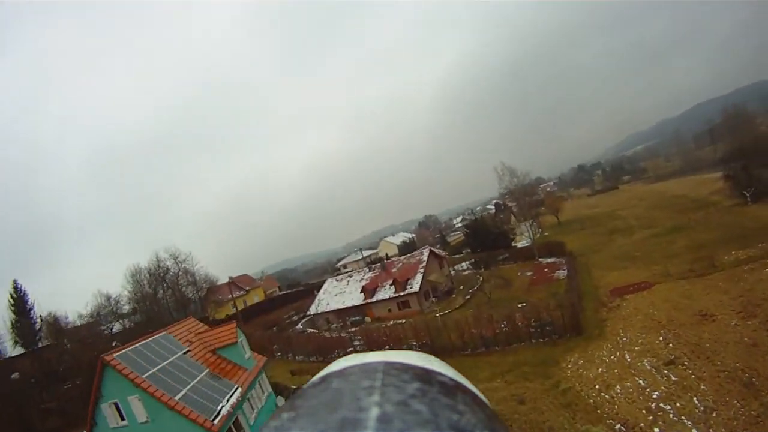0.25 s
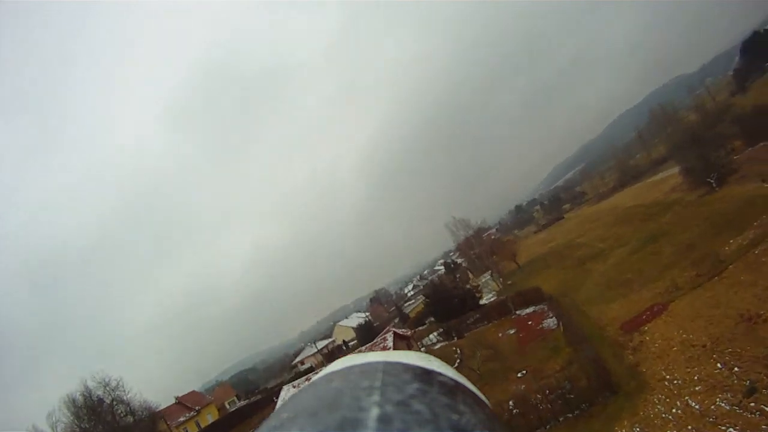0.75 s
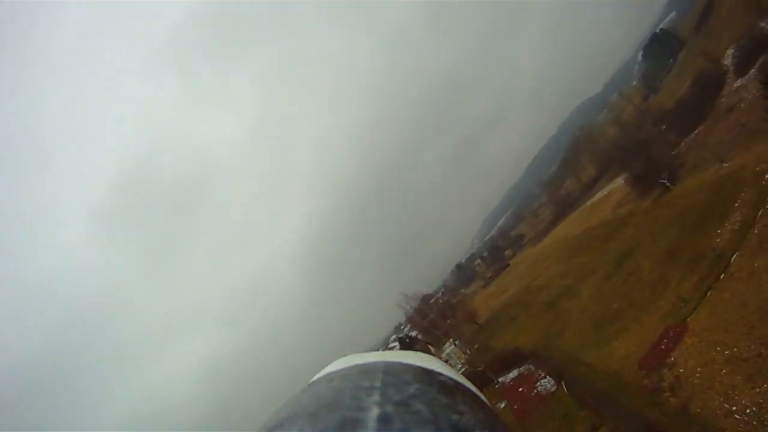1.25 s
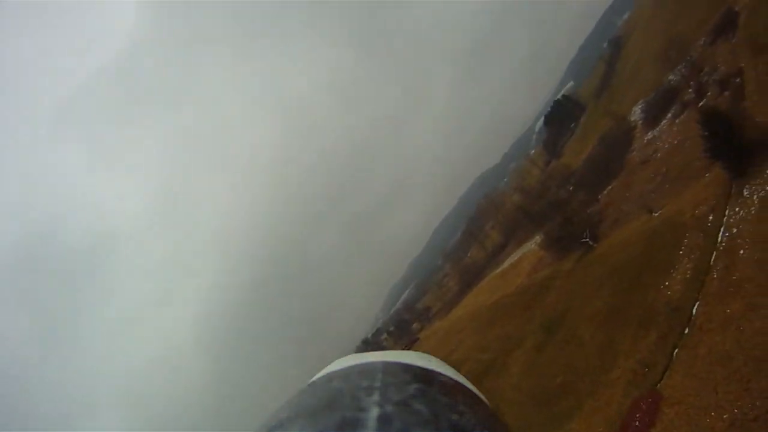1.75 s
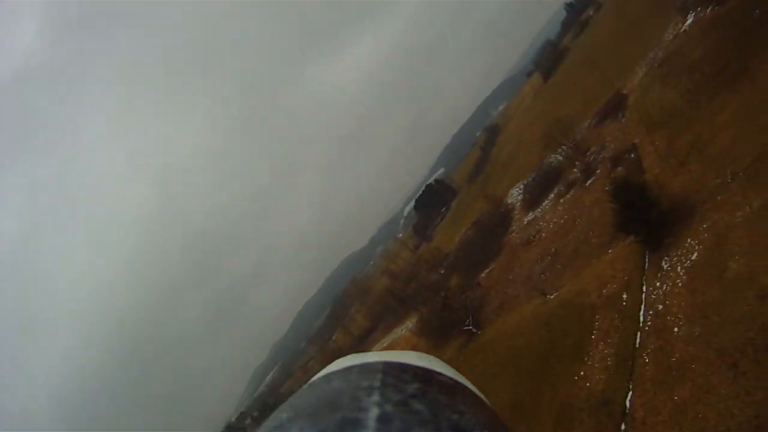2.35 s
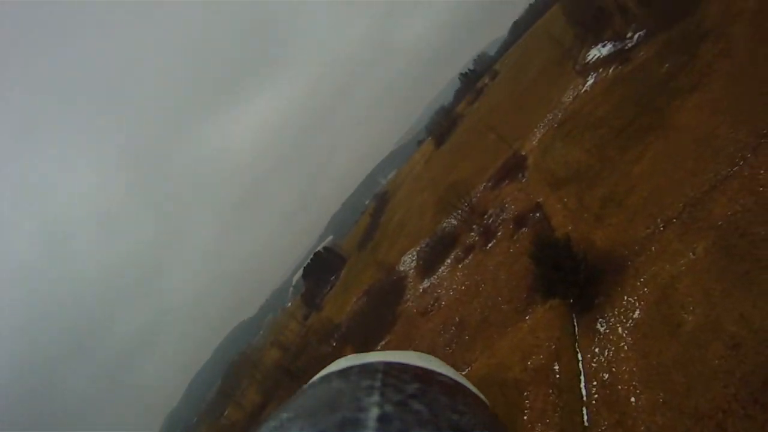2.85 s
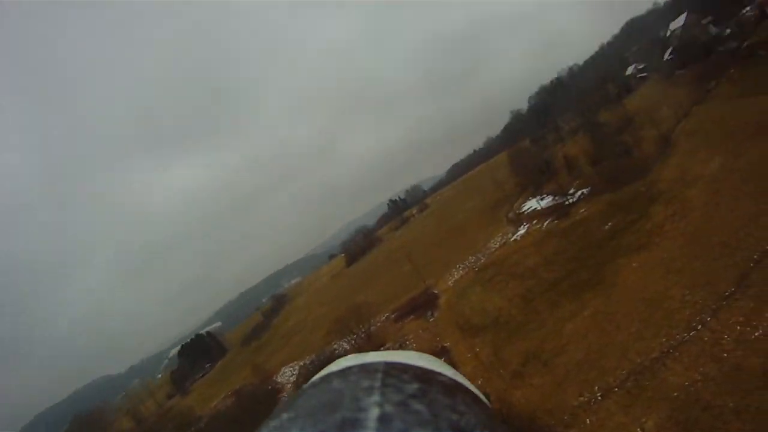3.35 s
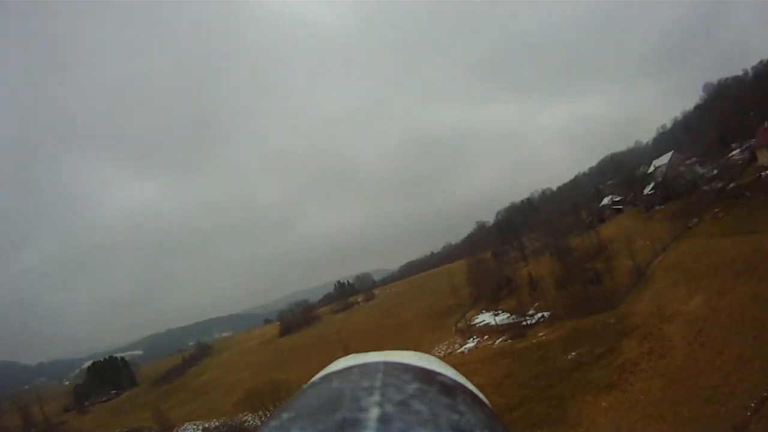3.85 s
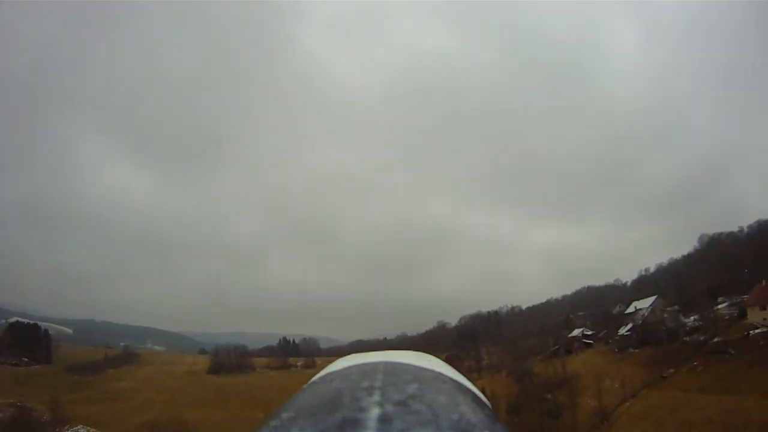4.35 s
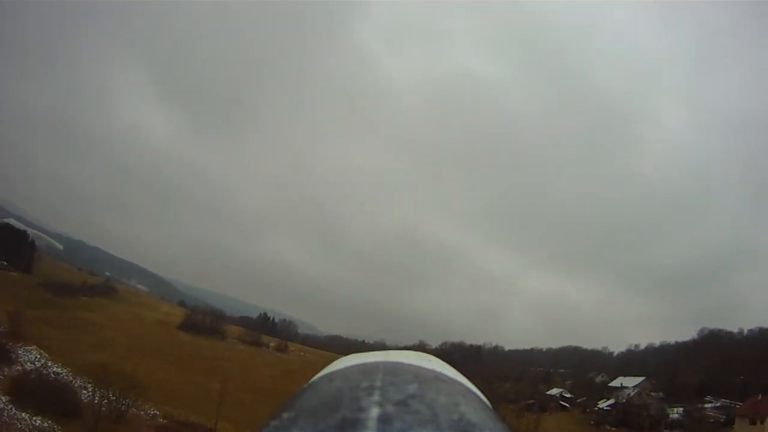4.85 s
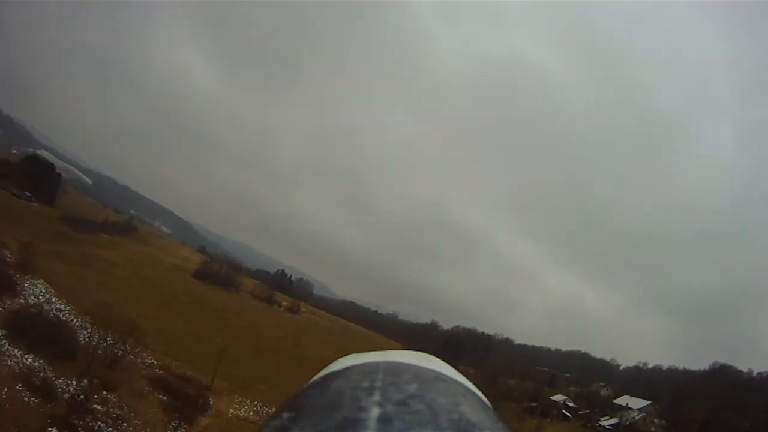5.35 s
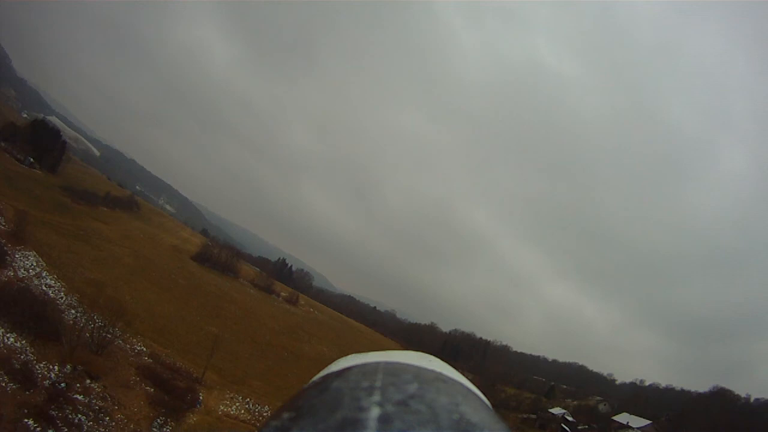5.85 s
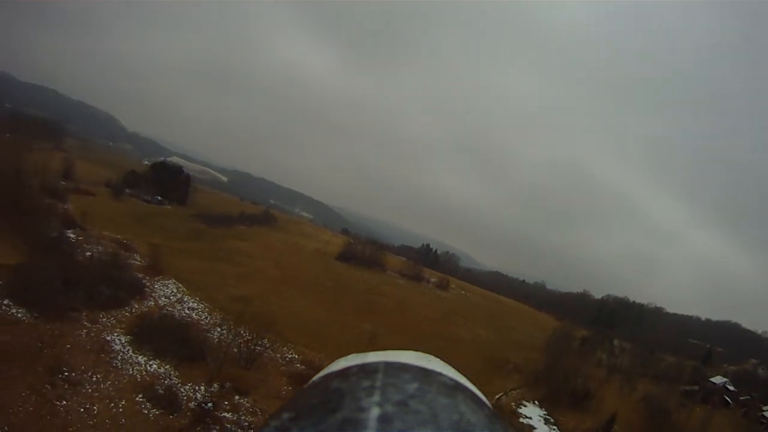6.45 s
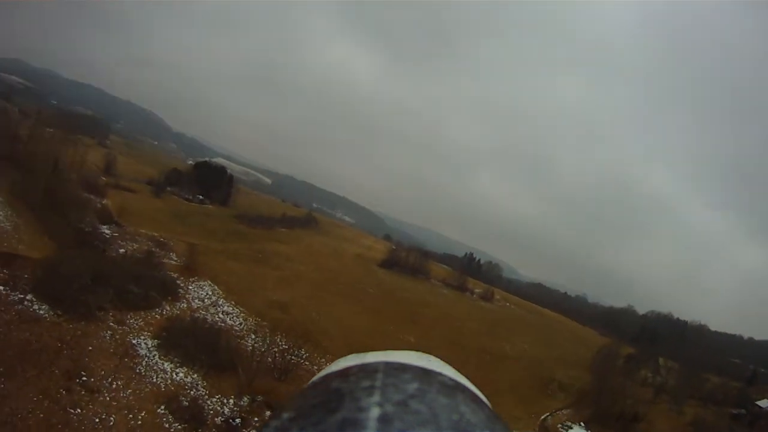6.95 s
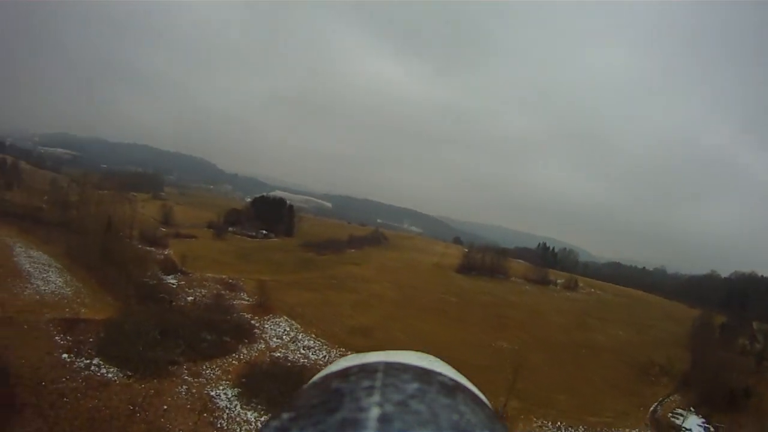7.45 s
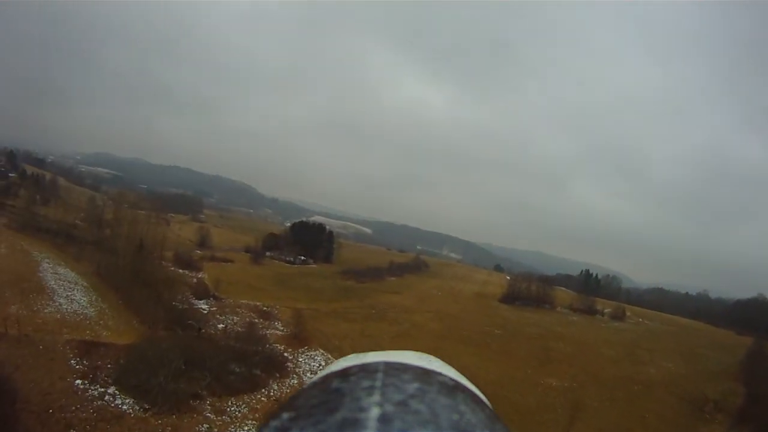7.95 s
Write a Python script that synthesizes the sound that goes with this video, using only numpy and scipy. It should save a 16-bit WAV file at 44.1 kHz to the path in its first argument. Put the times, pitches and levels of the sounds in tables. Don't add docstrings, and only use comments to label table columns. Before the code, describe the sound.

Close onboard buzz of a model plane's propeller, its airy roar rising and falling with load over faint whine, rattly ticks and wind buffeting.

```python
import sys
import numpy as np
from scipy import signal
from scipy.fft import rfft, irfft, next_fast_len
from scipy.io import wavfile
from scipy.ndimage import uniform_filter1d

SR = 44100
rng = np.random.default_rng(int(sys.argv[2]) if len(sys.argv) > 2 else 0)


def convert_level_to_amplitude(level_db):
    exponent = np.asarray(level_db, float) / 20
    return 10 ** exponent


def put_to_file(sound):
    columns = np.atleast_2d(sound).T
    safe = np.clip(columns, -1, 1)
    whole_steps = np.round(safe * 32767)
    wavfile.write(sys.argv[1], SR, whole_steps.astype(np.int16))


N = 361619
CRUISE_DB = -18
LAG_RAD = .6
WIND_RISE_S = .11


# time in seconds, blade passes in Hz (two a turn).
BLADE_RATE = [(0, 382.6), (.45, 383.3), (.85, 379.7), (1.72, 371.6), (2.3, 367.4), (2.47, 368), (2.62, 378),
              (2.76, 381.6), (3.25, 378.1), (3.85, 386.6), (4.1, 384), (4.65, 383.4), (5.1, 376.8),
              (5.45, 377.2), (5.9, 381.8), (6.85, 382), (7.45, 389.1), (8.2, 392.4)]


def shaft_angle():
    return np.pi * np.cumsum(uniform_filter1d(over_time(BLADE_RATE), size=3000)) / SR


# shaft order, level in dB rms, wander in dB.
STEADY_ORDERS = [(3, -41, 1), (4, -42, 1.2), (10, -40, 1.2), (14, -51, 1.5), (15, -47, 1.5), (27, -63, 1.2),
                 (34, -61, 1.2), (44, -66, 1.2), (45, -64, 1.2)]
# shaft order, level in dB against the rush, wander in dB.
LOADED_ORDERS = [(4, -29, 1.5), (5, -17, 1.5), (10, -20, 1.5)]
# shaft order, level in dB rms at cruise, share of the load's swing.
PANEL_ORDERS = [(6, -32.5, 0.87), (7, -34.5, 0.46), (8, -31, 0.83), (9, -33.5, 1.36)]
# shaft order, start in seconds, length in seconds, gain in
# dB.
SINGING = [(9, -0.75, 1.17, 7.5), (8, -0.7, 0.59, 4), (6, .75, .55, 9), (7, 1.1, .3, -8),
           (6, 2.5, 0.59, 5.5), (9, 2.5, .4, 5), (8, 3.5, .6, 3), (6, 4.5, 2.9, 5), (7, 4.5, 1.14, 4),
           (7, 4, .3, -17), (6, 6, 0.24, 3), (7, 7, 1.9, 4), (9, 7.1, 0.54, 6.5), (8, 7.5, 1.2, 8.5),
           (6, 7.7, .7, -5), (6, 0.5, 0.71, -2.5), (6, 1.5, .9, -3), (7, 2.5, 1.7, 2.5), (9, 4, .9, -4),
           (8, 5, 1.05, -2.5), (8, 3, .5, -8)]
# start in seconds, length in seconds, gain in dB.
MAGNET_SPELLS = [
    (1.4, 1.2, 16.5),
    (4.8, .85, 7),
]
# time in seconds, level before in dB, level after in dB.
UNBALANCE = (.95, -47, -43)


def propeller(shaft, rush_db):
    t = np.arange(N) / SR
    swing_db = rush_db - CRUISE_DB
    out = order(shaft, 2, -27.5 + .74 * swing_db - .02 * t, .96)

    step_s, before_db, after_db = UNBALANCE
    unbalance_db = np.interp(t, [step_s - .03, step_s + .03], [before_db, after_db])
    out = out + order(shaft, 1, unbalance_db, np.where(t < step_s, 3, 1))

    swell_db = uniform_filter1d(swing_db, size=6000)
    for multiple, level_db, follows in PANEL_ORDERS:
        sung = [row[1:] for row in SINGING if row[0] == multiple]
        panel_db = level_db + follows * swell_db + spells(sung, rise_s=.11)
        out = out + order(shaft, multiple, panel_db, .96)

    out = out + order(shaft, 75, -80.5 + spells(MAGNET_SPELLS, rise_s=.2), .8)
    out = out + sum(order(shaft, *row) for row in STEADY_ORDERS)
    return out + convert_level_to_amplitude(rush_db) * sum(order(shaft, *row) for row in LOADED_ORDERS)


def order(shaft, multiple, level_db, wander_db):
    phase = multiple * (shaft - LAG_RAD) + .2 * wander_db * drift(9) + .9 * rng.standard_normal()
    return np.sqrt(2) * convert_level_to_amplitude(level_db + wander_db * drift(8)) * np.cos(phase)


# frequency in Hz, density in dB per Hz.
RUSH_SPECTRUM = [(40, -63), (150, -30), (320, -15), (480, -27.5), (850, -6), (1150, -4.5), (1400, -5.5),
                 (2100, -5.5), (3000, -16), (5000, -24), (7500, -27.5), (9500, -33), (11000, -41.5),
                 (15300, -49)]
# frequency in Hz, width in Hz, height in dB.
RUSH_PEAKS = [(264, 31, 7.5), (1659, 390, 8.5), (3326, 250, 6), (5730, 260, -10)]


def rush(shaft, rush_db, bright_db):
    angle = shaft - LAG_RAD
    chop = 1 + .1 * np.cos(angle) + .05 * np.cos(2 * angle)
    steadier_db = .84 * (uniform_filter1d(rush_db, size=14000) - rush_db)
    noise = coloured_noise(RUSH_SPECTRUM, RUSH_PEAKS, shared_db=.44, own_db=0,
                           bright_db=bright_db + steadier_db)
    return convert_level_to_amplitude(rush_db - 1.6) * chop * noise


# frequency in Hz, level in dB, 60 dB decay in seconds.
SLAP_MODES = [(1140, -21, 0.011), (1681, 5.5, 0.03), (2350, -3.5, 0.0015), (3350, -13, 0.0081),
              (5500, -39.5, 0.0034)]


def slaps(shaft, rush_db):
    at = passes(shaft, count=2)
    bite = convert_level_to_amplitude(4 * (np.arange(len(at)) % 2))
    clicks = np.zeros(N)
    clicks[at] = bite * (.4 + np.clip(rng.standard_normal(len(at)), -2.1, 2.1))
    rings = sum(convert_level_to_amplitude(db) * ring(clicks, hz, t60) for hz, db, t60 in SLAP_MODES)
    return convert_level_to_amplitude(rush_db - 7) * rms_one(band_pass(rings, 800, 9000))


def passes(shaft, count):
    return np.flatnonzero(np.diff(np.floor(shaft * count / (2 * np.pi))))


def cavity(rush_db, bright_db):
    hz, t60 = 5720, .0075
    tone = ring(ring(rng.standard_normal(N), hz, t60), hz, t60)
    swell_db = 1.35 * (uniform_filter1d(rush_db, size=14000) + 14)
    return convert_level_to_amplitude(swell_db + .6 * bright_db - 36.5 + 2.4 * drift(14)) * rms_one(tone)


# frequency in Hz, level in dB, 60 dB decay in seconds.
MOTOR_MODES = [(8550, -6, .012), (9200, 1, .012), (12300, -6, .012), (13300, -11, .012), (14000, -12, .012)]


def motor(shaft):
    turns = shaft / (2 * np.pi)
    at = passes(shaft, count=1)
    late = (turns[at + 1] % 1) / (turns[at + 1] - turns[at])
    size = convert_level_to_amplitude(.6 * rng.standard_normal(len(at)))
    clicks = np.zeros(N)
    clicks[at] = size * late
    clicks[at + 1] = size * (1 - late)
    rings = sum(convert_level_to_amplitude(db + 1.5 * drift(.8)) * ring(clicks, hz, t60) for hz, db, t60 in MOTOR_MODES)
    return convert_level_to_amplitude(-57.5) * rms_one(band_pass(rings, 7800, 15000))


# frequency in Hz, level in dB rms.
WHISTLE = [(5680.0, -62), (5725.4, -61), (5770.9, -58), (5816.4, -59), (5861.7, -57), (5907.2, -55),
           (5952.6, -51), (5998.1, -47), (6043.6, -61)]


def electronics():
    t = np.arange(N) / SR
    out = 0
    for hz, db in WHISTLE:
        out = out + np.sqrt(2) * convert_level_to_amplitude(db) * np.sin(2 * np.pi * hz * t + rng.uniform(0, 2 * np.pi))
    return out


# time in seconds, peak in dB.
TOUCHES = [(0.0623, -22), (0.3386, -26), (0.3591, -20), (0.381, -17), (0.5192, -24), (0.6315, -17),
           (0.7786, -19), (2.7856, -22), (2.8494, -29), (3.0111, -20), (3.4052, -28), (3.4441, -24),
           (3.464, -15), (3.5019, -17), (3.5674, -30), (3.5947, -27), (3.4274, -30), (3.8666, -27),
           (4.0444, -31), (4.0814, -33), (4.1739, -25), (5.253, -34), (5.2904, -26), (5.3433, -31),
           (5.444, -36), (5.5717, -28), (6.0701, -23), (6.1499, -26), (6.1734, -19)]
# start in seconds, number of touches, peak in dB.
RATTLES = [
    (3.0574, 9, -18),
    (3.7714, 4, -27),
    (6.1135, 4, -19),
]


def touches():
    runs = []
    for start_s, count, db in RATTLES:
        for k in range(count):
            gap_s = .0052 * rng.uniform(.9, 1.1)
            runs.append((start_s + gap_s * k, db - .5 * k - 6 * (k % 2)))
    return np.transpose(TOUCHES + runs)


# frequency in Hz, level in dB, 60 dB decay in seconds.
TICK_MODES = [(7750, 0, .008), (8200, -2, .007), (9400, -3, .007), (10000, -9, .004)]
# frequency in Hz, level in dB, 60 dB decay in seconds.
TICK_TOP = [(13900, 2, .004), (14800, 0, .003)]


def ticks():
    s, peak_db = touches()
    top_db = -47.5 + .55 * (peak_db + 24)
    luck = rng.standard_normal((len(s), 6))
    at = (s * SR).astype(int)
    rebound = at + (SR * .0009 * convert_level_to_amplitude(2.3 * luck[:, 5])).astype(int)

    def struck(modes, blow_db):
        rings = 0
        for k, (hz, level_db, t60) in enumerate(modes):
            clicks = np.zeros(N)
            clicks[at] = convert_level_to_amplitude(blow_db + level_db + 1.8 * luck[:, k])
            clicks[rebound] += .6 * clicks[at] * np.sign(luck[:, 4])
            rings = rings + ring(clicks, hz, t60)
        return rings

    main = band_pass(struck(TICK_MODES, peak_db - 6.5), 7400, 9900)
    return main + band_pass(struck(TICK_TOP, top_db + 3.5), 13000, 15500)


# time in seconds, peak in dB.
KNOCKS = [(0.175, -1), (0.2954, -1), (0.3995, -1), (3.4052, -3), (3.4261, -2), (3.5209, -2), (3.5678, -2),
          (3.698, -1), (3.7703, 0), (3.7913, 0), (3.8686, -1), (3.8896, -2), (4.0811, -1), (6.0147, -3)]


def knocks():
    s, peak_db = np.transpose(KNOCKS)
    clicks = np.zeros(N)
    clicks[(s * SR).astype(int)] = -convert_level_to_amplitude(peak_db)
    body = band_pass(ring(clicks, hz=1690, t60=.012), 800, 9000)
    crack = band_pass(clicks + 1e-18, 3500, 15500)
    return convert_level_to_amplitude(-5) * body + convert_level_to_amplitude(-19) * crack


# frequency in Hz, density in dB per Hz.
DRONE_SPECTRUM = [(40, -53), (150, -24), (330, -13.5), (480, -13.5), (900, -12.5), (1020, -20), (1200, -5),
                  (1700, -2.5), (2500, -29.5), (3800, -16), (4300, -23.5), (6500, -20.5), (10800, -50),
                  (15300, -44)]
# frequency in Hz, width in Hz, height in dB.
DRONE_PEAKS = [(284.4, 80, 12.5), (2810, 740, 21), (8500, 1200, 13.5), (11880, 1800, 16.5),
               (13400, 700, 11)]


def drone():
    return convert_level_to_amplitude(-29) * coloured_noise(DRONE_SPECTRUM, DRONE_PEAKS, shared_db=-2.5, own_db=1.06, count=9)


# frequency in Hz, density in dB per Hz.
BUFFET_SPECTRUM = [(120, -65), (250, -6), (420, 2), (600, 7.5), (800, 4), (1200, -41)]


def buffet(buffet_db):
    return convert_level_to_amplitude(buffet_db - 2.5) * coloured_noise(BUFFET_SPECTRUM, [], shared_db=1.2, own_db=1.2, count=3)


# frequency in Hz, density in dB per Hz.
RUMBLE_SPECTRUM = [(40, -30), (70, -15), (105, -5), (140, 14), (200, 0), (260, -46)]


def rumble(rumble_db):
    return convert_level_to_amplitude(rumble_db + .5) * coloured_noise(RUMBLE_SPECTRUM, [], shared_db=6, own_db=-1, count=2)


# time in seconds, level in dB.
LOAD = [(0, -13.5), (.8, -14), (1.2, -18), (1.76, -22), (2.5, -22.5), (2.95, -20.5), (3.1, -17.5),
        (3.85, -14), (4.5, -17), (4.9, -24.5), (5.45, -26.5), (5.92, -22.5), (6.02, -17), (6.27, -17.5),
        (6.36, -21), (6.8, -23.5), (7.2, -16.5), (8.2, -16)]
# time in seconds, gain in dB.
BUMPS = [(.2, 0), (.84, -1), (.91, 0), (.96, 2), (1.16, 4), (2.56, -2.5), (2.78, 5), (2.9, 7), (2.99, 4),
         (3.04, 0), (3.42, 2), (4.57, -5), (4.63, 4.5), (4.8, 3), (4.84, -1.5), (5.39, -6), (5.53, -7),
         (5.66, 3), (5.71, -6), (6.01, 4.5), (6.21, 2.1), (6.25, -3.5), (6.28, 4.5), (6.94, 4), (7.01, -3),
         (7.12, 3.5)]


def blade_load():
    load_db = over_time(LOAD)
    bumps_db = 2 * spells([(s, 0, db) for s, db in BUMPS], rise_s=.064)
    return load_db, load_db + bumps_db


# start in seconds, length in seconds, buffet gain in dB, brightness gain in dB.
SIDESLIP = (5.83, .36, 9, -4.5)
# start in seconds, length in seconds, gain in dB.
RUMBLING = [
    (2.5, 2.3, 9),
    (3.8, .25, 2),
    (5.6, 2.7, 6.5),
    (5.98, .12, 11),
]


def airflow(load_db):
    t = np.arange(N) / SR
    start_s, length_s, slip_buffet_db, slip_bright_db = SIDESLIP
    slip = spells([(start_s, length_s, 1)], WIND_RISE_S)
    earlier_slip = np.roll(slip, -int(.15 * SR))
    buffet_db = -34 + .95 * (load_db - CRUISE_DB) - .75 * t + slip_buffet_db * slip
    rumble_db = -59 + spells(RUMBLING, WIND_RISE_S)
    bright_db = 3.5 - .98 * t + slip_bright_db * earlier_slip
    return buffet_db, rumble_db, bright_db


def coloured_noise(spectrum, peaks, shared_db, own_db, bright_db=0, count=12):
    size = next_fast_len(N)
    hz = np.maximum(np.arange(size // 2 + 1) * SR / size, 1)
    points = np.array(spectrum)
    colour_db = np.interp(np.log(hz), np.log(points[:, 0]), points[:, 1])
    for peak_hz, width_hz, peak_db in peaks:
        colour_db = colour_db + peak_db / (1 + (2 * (hz - peak_hz) / width_hz) ** 2)
    span = np.log(points[[0, -1], 0])
    place = np.interp(np.log(hz), span, [0, count - 1])
    tilt = np.clip((np.linspace(*span, count) - np.log(2000)) / np.log(4), 0, 1)
    noise = rfft(rng.standard_normal(size)) * convert_level_to_amplitude(colour_db)
    together = .2 * drift(4) + .23 * drift(41)
    out = 0
    for band in range(count):
        share = np.clip(1 - np.abs(place - band), 0, 1)
        gain_db = shared_db * together + own_db * drift(14) + tilt[band] * bright_db
        out = out + convert_level_to_amplitude(gain_db) * irfft(noise * share, size)[:N]
    return rms_one(out)


def ring(clicks, hz, t60):
    r = convert_level_to_amplitude(-60 / (t60 * SR))
    w = 2 * np.pi * hz / SR
    return signal.lfilter([0, np.sin(w)], [1, -2 * r * np.cos(w), r * r], clicks + 1e-18)


def band_pass(x, low_hz, high_hz):
    return signal.sosfilt(signal.butter(3, [low_hz, high_hz], "band", fs=SR, output="sos"), x)


def drift(rate):
    step = 40
    r = np.exp(-2 * np.pi * rate * step / SR)
    coarse = rng.standard_normal(N // step + 2002)
    slow = signal.lfilter([1], [1, -2 * r, r * r], coarse)[2000:]
    return np.interp(np.arange(N) / step, np.arange(len(slow)), rms_one(slow))


def spells(rows, rise_s):
    t = np.arange(0, N / SR + .004, .002)
    total = np.zeros(len(t))
    for start_s, length_s, db in rows:
        inside_s = np.minimum(t - start_s, start_s + length_s - t)
        total += db * np.clip(inside_s / rise_s + .5, 0, 1)
    return np.interp(np.arange(N) / SR, t, total)


def over_time(rows):
    s, value = np.transpose(rows)
    return np.interp(np.arange(N) / SR, s, value)


def rms_one(x):
    return x / np.sqrt(np.mean(x ** 2) + 1e-20)


def scene():
    load_db, rush_db = blade_load()
    buffet_db, rumble_db, bright_db = airflow(load_db)
    shaft = shaft_angle()
    air = rush(shaft, rush_db, bright_db) + slaps(shaft, rush_db) + cavity(rush_db, bright_db)
    gusts = convert_level_to_amplitude(.58 * drift(37))
    driven = gusts * (propeller(shaft, rush_db) + air + drone() + buffet(buffet_db))
    mix = driven + rumble(rumble_db) + motor(shaft) + electronics() + ticks() + knocks()
    return mix[None]


def low_pass(x):
    return signal.sosfilt(signal.butter(12, 15410, fs=SR, output="sos"), x)


def record(dry):
    thin = signal.sosfilt(signal.butter(2, 55, "high", fs=SR, output="sos"), dry)
    return low_pass(np.clip(thin, -.99, .99))


dry = scene()
out = record(dry)
put_to_file(out)
```